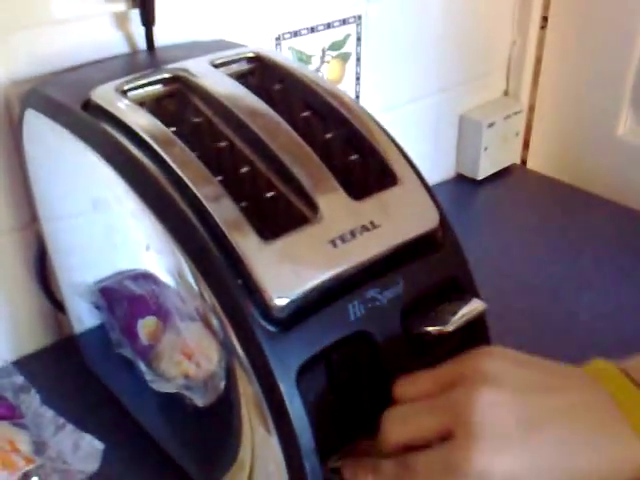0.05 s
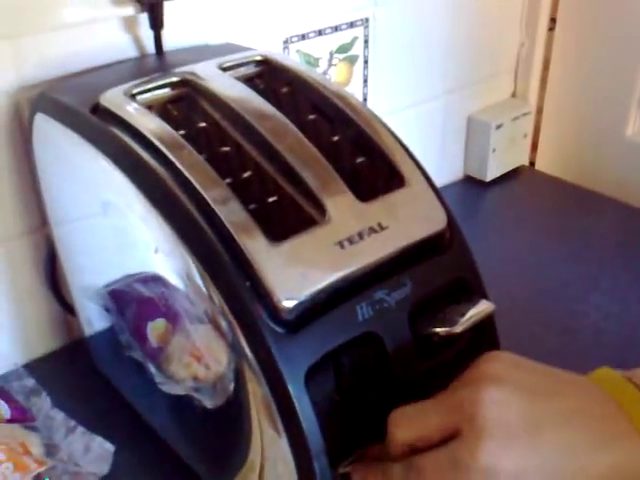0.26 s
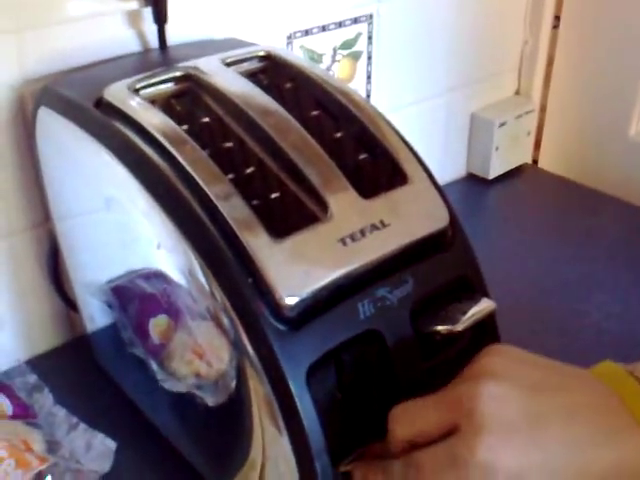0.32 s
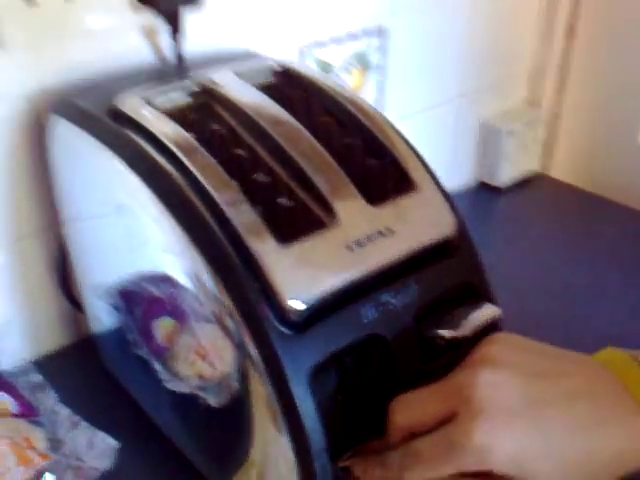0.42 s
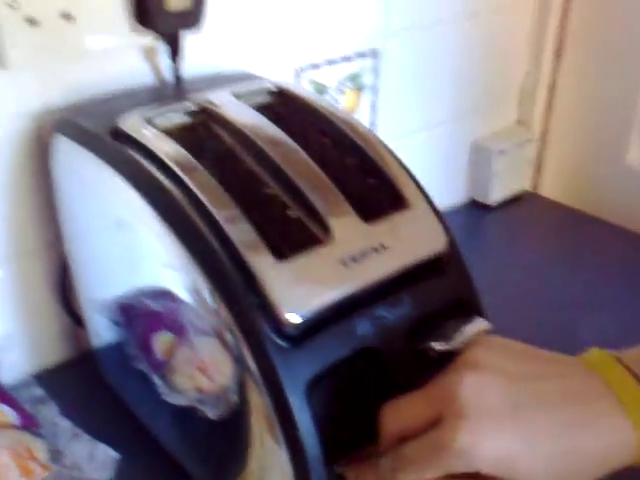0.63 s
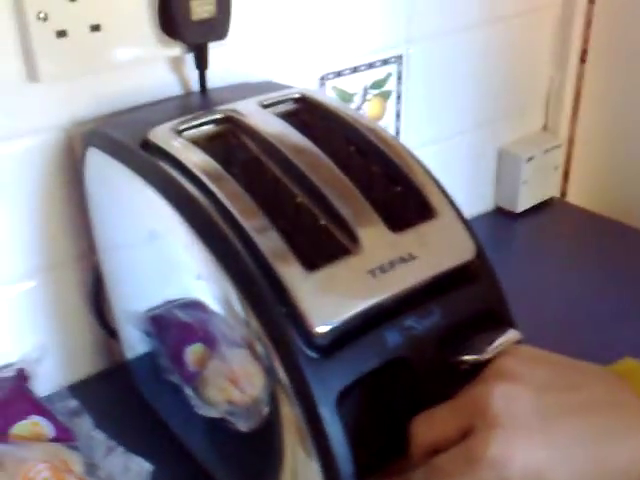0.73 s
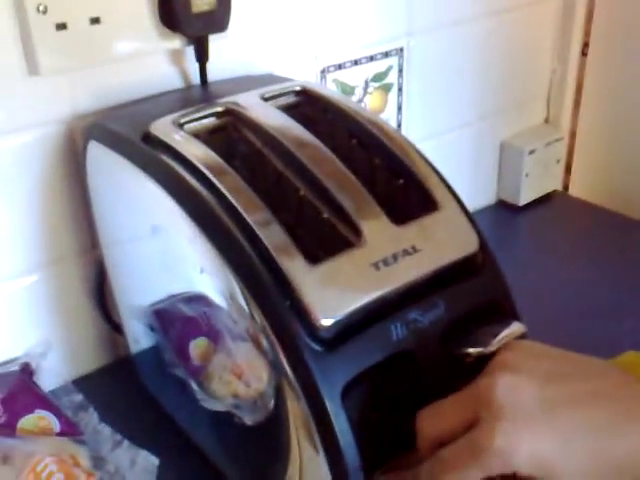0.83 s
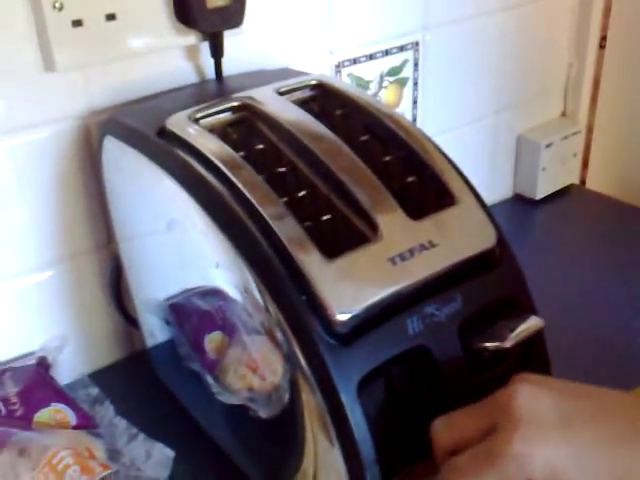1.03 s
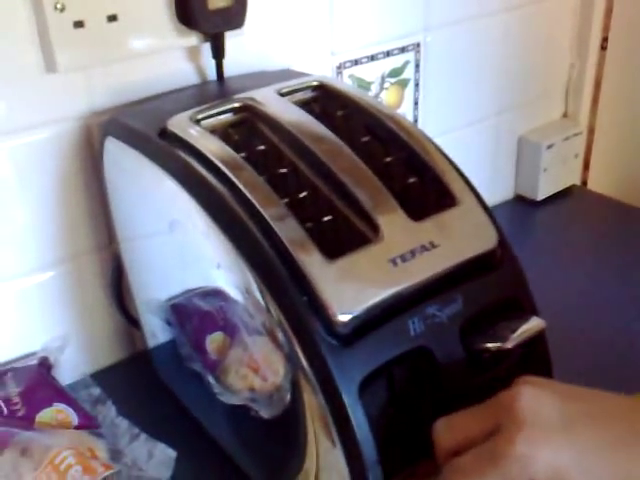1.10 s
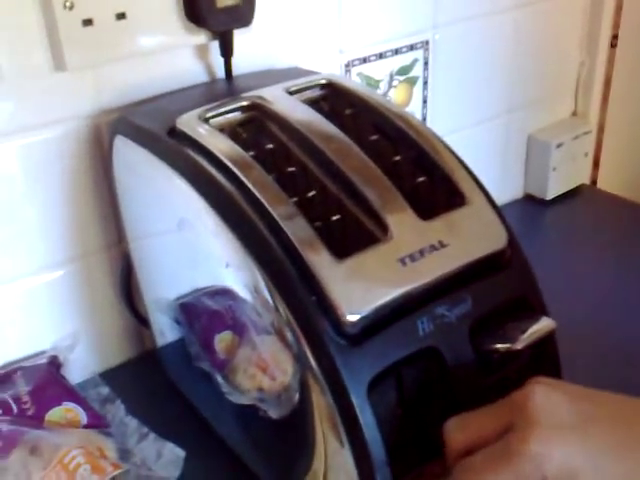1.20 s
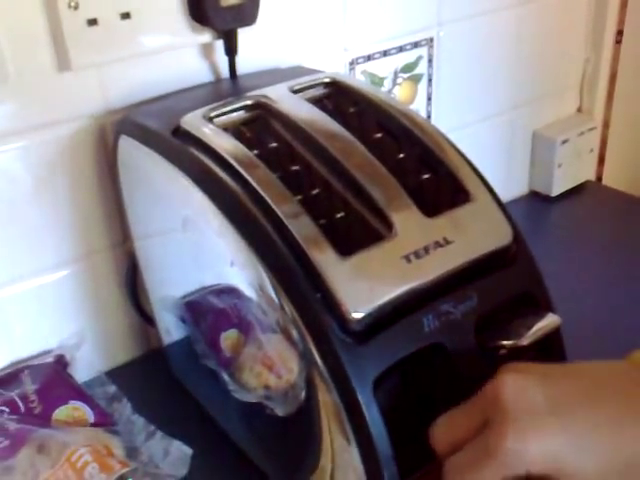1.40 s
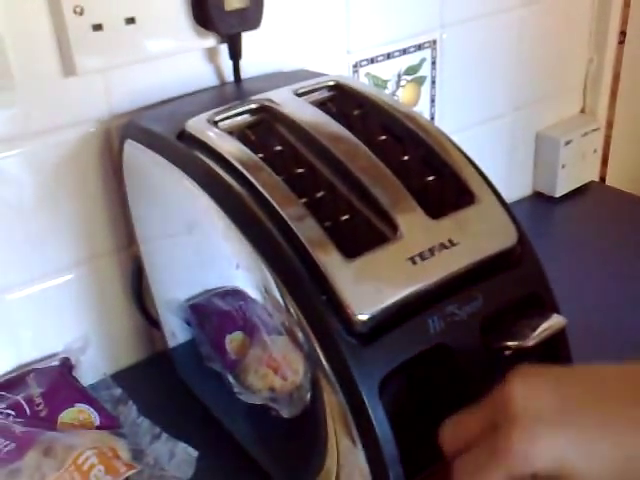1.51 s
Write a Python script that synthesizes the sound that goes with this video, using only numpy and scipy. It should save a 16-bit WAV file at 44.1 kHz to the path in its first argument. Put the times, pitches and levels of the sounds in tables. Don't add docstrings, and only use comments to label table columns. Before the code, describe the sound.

A toaster lever is worked by hand, with a loud metallic clatter, scraping and looser rattles.

```python
import sys
import numpy as np
from scipy import signal
from scipy.fft import rfft, irfft, next_fast_len
from scipy.io import wavfile

SR = 44100
rng = np.random.default_rng(int(sys.argv[2]) if len(sys.argv) > 2 else 0)


def wav_out(sig):
    wavfile.write(sys.argv[1], SR, np.round(np.clip(np.atleast_2d(sig).T, -1, 1) * 32767).astype(np.int16))


def rack_gain(trim_db):
    fader = np.asarray(trim_db, float)
    return 10 ** (fader / 20)


N = 68355

# time in seconds, scrape level in dB, shell and bracket levels in dB relative to the scrape.
SLIDES = [
    [(0.075, -50, -7, -2.5), (0.109, -53, -1.5, 3), (0.14, -45, 1.5, -0.5), (0.178, -27.5, -8, -8.5),
     (0.19, -36, -2, -1.5), (0.205, -30.5, -11.5, 3), (0.208, -19, -7, 1)],
    [(0.214, -15, -2.5, -4), (0.24, -12.5, -11.5, -9), (0.268, -13.5, -6.5, -6), (0.282, -14, -10.5, -11),
     (0.302, -18.5, -4.5, -6.5), (0.326, -14, -14, -5), (0.352, -19.5, -8.5, -13.5),
     (0.378, -22, -12, -8.5), (0.388, -30.5, -11, -5.5)],
    [(0.388, -25, -7, -4.5), (0.414, -31.5, -8.5, -6.5), (0.468, -34.5, -10, -3), (0.51, -41, -6, 3),
     (0.535, -64, 0.5, 1), (0.58, -89, 21, 19.5)],
    [(0.705, -28.5, -14, -10.5), (0.73, -29.5, -10.5, -6), (0.746, -20.5, -16, -11),
     (0.78, -24.5, -17, -10), (0.798, -27.5, -13, -11), (0.858, -30.5, -12.5, -13),
     (0.885, -44.5, -7.5, -7), (0.92, -71, 8.5, -6)],
    [(1.108, -53.5, -10, -11), (1.13, -44, -3, -4), (1.146, -39, -3, -8.5), (1.174, -22, -12, -9.5),
     (1.218, -33, -6, -2), (1.318, -34, -6, -4.5), (1.34, -54, 11.5, 4.5), (1.45, -81.5, 20.5, 12.5)],
]
# time in seconds, peak in dB, shell and bracket levels in dB relative to it, hold in seconds.
CONTACTS = [(0.0622, -23, -7, -10, 0.004), (0.136, -27.5, -5.5, -26, 0.008),
            (0.163, -25.5, -10, -7, 0.0074), (0.1796, -20.5, -15, -6, 0.0051),
            (0.2086, -5.5, -11, -13, 0.0024), (0.2197, -5, -15, -4.5, 0.0094),
            (0.279, -4.5, -28, -25, 0.0049), (0.308, -4.5, -14, -7.5, 0.0088),
            (0.323, -2.5, -15, -4.5, 0.0086), (0.34, -7.5, -21, -4, 0.0081), (0.36, -6, -22, -8, 0.01),
            (0.378, -16, -27, -14, 0.005), (0.417, -15, -29, -8, 0.006), (0.474, -19, -17, -8.5, 0.01),
            (0.6956, -6.5, -29, -16, 0.0085), (0.739, -13, -24, -9.5, 0.011),
            (0.754, -16.5, -17, -12, 0.016), (0.813, -25, -13, -7, 0.006),
            (0.9406, -18, -27, -16.5, 0.0085), (1.0663, -38.5, -15.5, -7, 0.006),
            (1.1062, -20, -27, -12.5, 0.015), (1.144, -20, -25, -14, 0.005), (1.151, -6, -28, -13.5, 0.018),
            (1.182, -9, -14, -6, 0.0073), (1.2238, -11, -12.5, -6.5, 0.01), (1.254, -17, -14, -20, 0.0071),
            (1.277, -16.5, -11.5, -11, 0.0097), (1.288, -17, -15, -12, 0.0056),
            (1.5014, -24.5, -2.5, -2, 0.016)]
# time in seconds, peak in dB.
TICKS = [(0.2574, 1.5), (0.2844, 1), (0.3174, 3.5), (0.3354, 1), (0.3454, -1.5), (0.3714, -0.5),
         (0.6973, -9.5), (0.7024, -9), (0.7444, -12), (0.7474, -8), (1.1538, -4.5), (1.1604, -7),
         (1.1654, -7.5), (1.1874, -8), (1.2324, -9.5)]
# start in seconds, level in dB, pitch in Hz, 60 dB decay time in seconds.
RINGS = [(.07, -40, 12855, 0.3), (.125, -38, 353, 0.31), (0.21, -1, 8540, 0.0091),
         (0.2097, -4.5, 5400, 0.013), (.216, -17.5, 835, 0.076), (0.233, -30.5, 1726, 0.13),
         (.312, -10, 11230, .05), (.3235, 4.5, 12235, 0.034), (.3235, -4.5, 12350, .04),
         (0.326, -20, 5960, 0.1), (.333, -21, 847, 0.13), (.33, -17, 940, 0.062),
         (0.335, -17.5, 4470, 0.13), (0.335, -20, 4720, 0.11), (.3595, 3.5, 11830, 0.032),
         (.36, -12, 10100, .04), (.375, -30, 11620, 0.18), (.385, -25.5, 12855, 0.22),
         (.425, -28.5, 5050, 0.19), (.44, -36, 1565, 0.15), (.475, -20, 12080, 0.062),
         (.472, -32, 5100, 0.068), (.945, -51, 1632, 0.28), (.943, -44, 2756, 0.11),
         (1.108, -18, 13600, 0.082), (1.108, -25, 11670, .06), (1.125, -38, 980, 0.082),
         (1.153, -10, 12240, 0.042), (1.165, -29, 4466, 0.086), (1.183, -13.5, 12350, .04),
         (1.186, -19, 4480, .06), (1.225, -23.5, 5210, 0.056), (1.238, -32, 948, 0.12),
         (1.28, -45, 4420, 0.32), (1.27, -34.5, 828.7, 0.25), (1.35, -40, 2630, 0.15),
         (1.502, -25, 1526, 0.062), (1.503, -36, 1030, .06), (1.502, -33.5, 1760, .06),
         (1.503, -32.5, 2183, 0.22), (1.503, -34, 1210, .09), (1.505, -37.5, 872, 0.19),
         (1.505, -27.5, 5160, .06), (1.53, -34, 428, 0.082)]
# time in seconds, peak in dB, pitch in Hz.
THUMPS = [(0.06, -35.5, 138), (0.099, -35.5, 99), (0.127, -32.5, 101.5), (0.157, -29.5, 120),
          (0.189, -24, 130), (0.2157, -5.5, 104.3), (0.25, -21.5, 141), (0.28, -26, 128.2),
          (0.325, -24.5, 97), (0.349, -23, 91), (0.368, -28.5, 96), (0.416, -31, 113), (0.459, -30.5, 91.5),
          (0.499, -34, 119.4), (0.524, -43, 140), (0.767, -33, 122), (0.852, -38.5, 100), (1.1, -37, 99),
          (1.176, -29.5, 101), (1.229, -28.5, 114), (1.318, -37.5, 107), (1.414, -37, 104)]
# pitch in Hz, level in dB relative to the base.
TRAY = [(235, -14), (310, -20.5)]
# frequency in Hz, density in dB per Hz.
WIRE_SPECTRUM = [(4710, -41), (8000, -12.5), (9420, -8), (10600, -4), (11900, 3), (16900, -11.5)]
# frequency in Hz, density in dB per Hz.
BRACKET_SPECTRUM = [(1940, -37.5), (3300, -17), (4640, 2.5), (5960, 1.5), (7580, -3), (9000, -5.5),
                    (11700, -14), (19800, -120)]
# frequency in Hz, density in dB per Hz.
SHELL_SPECTRUM = [(94, -20.5), (160, -1), (560, -5), (753, -22), (839, 0.5), (1170, -4.5), (1760, 1),
                  (1910, -1), (4000, -7.5), (5200, -12), (8800, -120)]
# pitch in Hz, width in Hz, level in dB.
ROD_MODES = [(4465, 20, 0.5), (5050, 14, -7.5), (11230, 55, 3.5), (11550, 37, 2.5), (11620, 25, -1),
             (11800, 14, 5.5), (12200, 30, 4), (12235, 24, 11.5), (12070, 36, 6), (12100, 30.7, 5.5),
             (12640, 25, 2.5), (12855, 22, 2.5), (14000, 35, -4), (13700, 69, 11)]
# pitch in Hz, width in Hz, level in dB.
PANEL_MODES = [(841, 21, 2.5), (1760, 37, -6), (2066, 55, 10), (2481, 58, 9)]
# frequency in Hz, density in dB per Hz.
ROOM_SPECTRUM = [(18, -28), (30, -1), (94, -6), (159, -15), (633, -29.5), (3270, -37), (3840, -39),
                 (6700, -44), (16900, -48)]

ATTACK_S, CONTACT_T60_S, SHELL_T60_S = 0.0056, 0.059, 0.12
WIRE_CONTACT_DB, BRACKET_CONTACT_DB, SHELL_CONTACT_DB = -13, -8.5, -6.5
GRAINS_PER_S, GRAIN_SPREAD_DB, RATTLE_DB = 16000, 1.5, 1
RODS_DB, PANELS_DB = -10.5, -12
BASE_HZ, BASE_WIDTH_HZ, BASE_DB = 105, 155, 0.5
SHEET_WIDTH_HZ, SHEET_DB = 16, -5
RING_RISE_S, RING_FLUTTER_DB, RING_FLUTTER_PER_S = 0.0038, 3.5, 45
TICK_DB = -7
THUMP_T60_S, THUMP_DB, THUMP_LEAD_S = 0.064, 0.5, -0.001
KITCHEN_T60_S, WALL_CUT_HZ, KITCHEN_DB = 0.6, 2600, -17.5
ROOM_DB = -47
SETTLE_S, SETTLE_DB = 0.18, -1
MIC_CUT_HZ, OVERLOAD = 47, 2.5


def rms_one(x):
    return x / np.sqrt(np.mean(x ** 2) + 1e-20)


def colour(x, points):
    hz, db = np.transpose(points)
    size = next_fast_len(N + 4096)
    f = np.maximum(np.arange(size // 2 + 1) * SR / size, 1)
    corners = np.r_[hz[0] / 2, hz, hz[-1] * 2]
    levels = np.r_[db[0] - 40, db, db[-1] - 40]
    gain = rack_gain(np.interp(np.log(f), np.log(corners), levels))
    cepstrum = irfft(np.log(gain), size)
    cepstrum[1:size // 2] *= 2
    cepstrum[size // 2 + 1:] = 0
    response = np.exp(rfft(cepstrum))
    return irfft(rfft(x, size) * response, size)[:N] / np.sqrt(np.mean(gain ** 2))


def resonate(x, hz, width_hz):
    r = np.exp(-np.pi * width_hz / SR)
    poles = [1, -2 * r * np.cos(2 * np.pi * hz / SR), r * r]
    return signal.lfilter([1, 0, -1], poles, x + 1e-18) * np.sqrt((1 - r * r) / 2)


def drift(rate):
    r = np.exp(-2 * np.pi * rate / SR)
    wander = signal.lfilter([1], [1, -2 * r, r * r], rng.standard_normal(N + 9000))
    return rms_one(wander[9000:])


def grains():
    sizes = rack_gain(GRAIN_SPREAD_DB * np.minimum(rng.exponential(1, N), 4)) * rng.standard_normal(N)
    return rms_one(sizes * (rng.random(N) < GRAINS_PER_S / SR))


def burst(start, hold, t60):
    t = np.arange(N) / SR - start + ATTACK_S / 2
    release = rack_gain(-60 * np.clip(t - ATTACK_S - hold, 0, 1) / t60)
    return np.clip(t / ATTACK_S, 0, 1) ** 2 * release


def modes(x, peaks):
    out, power = 0, 0
    for hz, width_hz, db in peaks:
        out = out + rack_gain(db) * resonate(x * rack_gain(1.7 * drift(14)), hz, width_hz)
        power += rack_gain(2 * db)
    return out / np.sqrt(power)


def carriage_forces():
    t = np.arange(N) / SR
    wires, brackets, shell = np.zeros((3, N))
    for stroke in SLIDES:
        s, db, shell_db, bracket_db = np.transpose(stroke)
        wires += rack_gain(2 * np.interp(t, s, db, -99, -99))
        brackets += rack_gain(2 * np.interp(t, s, db + bracket_db, -99, -99))
        shell += rack_gain(2 * np.interp(t, s, db + shell_db, -99, -99))
    for s, db, shell_db, bracket_db, hold in CONTACTS:
        knock = burst(s, hold, CONTACT_T60_S)
        shell_knock = burst(s + 0.0025, hold, SHELL_T60_S)
        wires += (rack_gain(db + WIRE_CONTACT_DB) * knock) ** 2
        brackets += (rack_gain(db + bracket_db + BRACKET_CONTACT_DB) * knock) ** 2
        shell += (rack_gain(db + shell_db + SHELL_CONTACT_DB) * shell_knock) ** 2
    rattle = rack_gain(RATTLE_DB * drift(60))
    shell_rattle = rack_gain(RATTLE_DB * drift(32))
    return np.sqrt(wires) * rattle, np.sqrt(brackets) * rattle, np.sqrt(shell) * shell_rattle


def carriage():
    wires, brackets, shell = carriage_forces()
    scrape, mode_scrape = grains(), grains()
    metal = colour(wires * scrape, WIRE_SPECTRUM) + colour(brackets * grains(), BRACKET_SPECTRUM)
    rods = rack_gain(RODS_DB) * modes(wires * mode_scrape, ROD_MODES)
    body = colour(shell * scrape, SHELL_SPECTRUM)
    panels = rack_gain(PANELS_DB) * modes(shell * mode_scrape, PANEL_MODES)
    rumble = resonate(shell * rng.standard_normal(N), BASE_HZ, BASE_WIDTH_HZ)
    base = rack_gain(BASE_DB) * resonate(rumble, BASE_HZ, 100) * 0.047
    return metal + rods + body + panels + base + sheet(shell * mode_scrape, brackets * mode_scrape)


def sheet(shell_drive, bracket_drive):
    pitches = np.geomspace(720, 7500, 60) * rng.uniform(.97, 1.03, 60)
    swings = [rack_gain(5.0 * drift(12)) for _ in range(12)]
    out = 0
    for k, hz in enumerate(pitches):
        drive = shell_drive if hz < 3500 else bracket_drive
        out = out + resonate(drive * swings[k % 12], hz, SHEET_WIDTH_HZ)
    return rack_gain(SHEET_DB) * out / 12


def rings():
    out, flutter = 0, RING_FLUTTER_DB * drift(RING_FLUTTER_PER_S)
    for s, db, hz, t60 in RINGS:
        t = np.maximum(np.arange(N) / SR - s, 0)
        own_flutter = np.roll(flutter, rng.integers(N))
        level = rack_gain(db - 60 * np.minimum(t / t60, 3) + own_flutter)
        rise = 1 - np.exp(-t / min(RING_RISE_S, t60 / 20))
        out = out + level * rise * np.sin(2 * np.pi * hz * t)
    return out


def ticks():
    clicks, one = np.zeros((2, N))
    one[0] = 1
    for s, db in TICKS:
        clicks[int(s * SR)] = rack_gain(db + TICK_DB)
    one_peak = np.max(np.abs(colour(one, WIRE_SPECTRUM)))
    return colour(clicks, WIRE_SPECTRUM) / one_peak


def thumps():
    out, decay = 0, 2 * np.log(1000) / THUMP_T60_S
    for s, db, hz in THUMPS:
        t = np.maximum(np.arange(N) / SR - s + THUMP_LEAD_S, 0)
        swell = (decay * t / 4) ** 4 * np.exp(4 - decay * t)
        swing = np.sin(2 * np.pi * hz * t)
        for tray_hz, tray_db in TRAY:
            swing = swing + rack_gain(tray_db) * np.sin(2 * np.pi * tray_hz * t)
        out = out + rack_gain(db + THUMP_DB) * swell * swing
    return out


def kitchen(x):
    out, dull = np.zeros(N), np.exp(-2 * np.pi * WALL_CUT_HZ / SR)
    lags = (rng.uniform(.012, .035, 8) * SR).astype(int)
    for k, lag in enumerate(lags):
        loop, state = x.copy(), [0.]
        gain = rack_gain(-60 * lag / SR / KITCHEN_T60_S)
        for i in range(lag, N, lag):
            back, state = signal.lfilter([gain * (1 - dull)], [1, -dull], loop[i - lag:i], zi=state)
            loop[i:i + lag] += back[:N - i]
        out += (loop - x) * (-1) ** k
    return out


def room_tone():
    at_start = np.arange(N) / SR < SETTLE_S
    level = rack_gain(ROOM_DB + drift(14) + SETTLE_DB * at_start)
    return level * rms_one(colour(rng.standard_normal(N), ROOM_SPECTRUM))


def scene():
    toaster = carriage() + rings() + ticks()
    return (toaster + thumps() + rack_gain(KITCHEN_DB) * kitchen(toaster) + room_tone())[None]


def top_cut(x):
    return signal.sosfilt(signal.butter(12, 17090, fs=SR, output="sos"), x)


def record(dry):
    bass_cut = signal.butter(2, MIC_CUT_HZ, "high", fs=SR, output="sos")
    heard = signal.sosfilt(bass_cut, dry)
    mix = np.clip(OVERLOAD * np.tanh(heard / OVERLOAD), -1, 1)
    return top_cut(mix)


dry = scene()
out = record(dry)
wav_out(out)
```